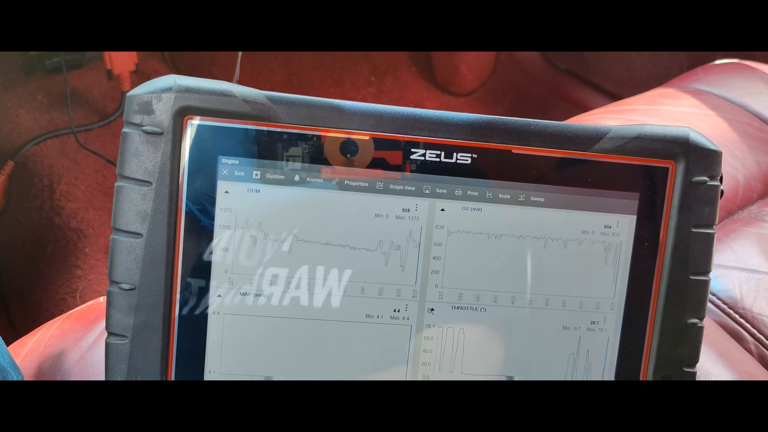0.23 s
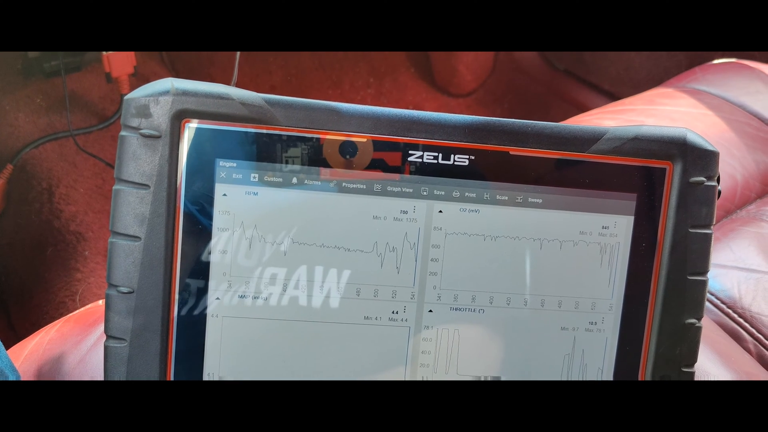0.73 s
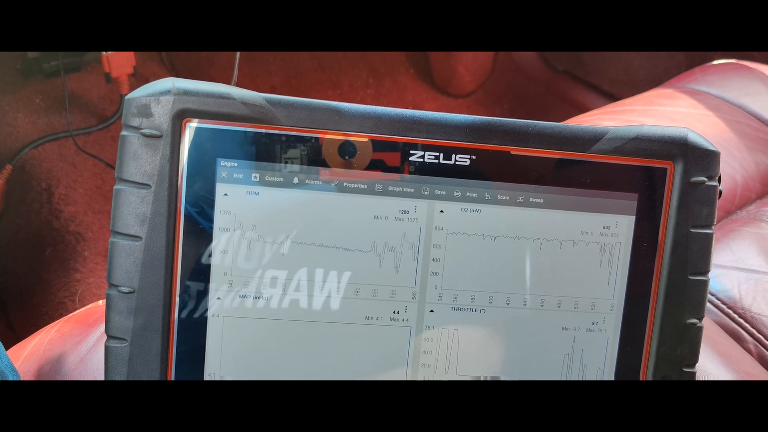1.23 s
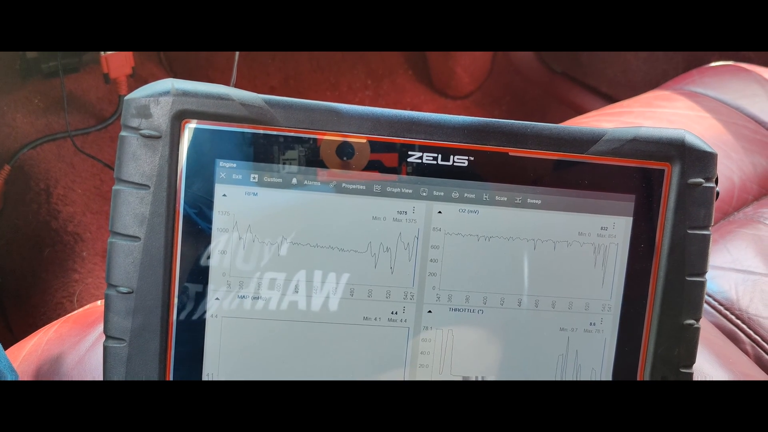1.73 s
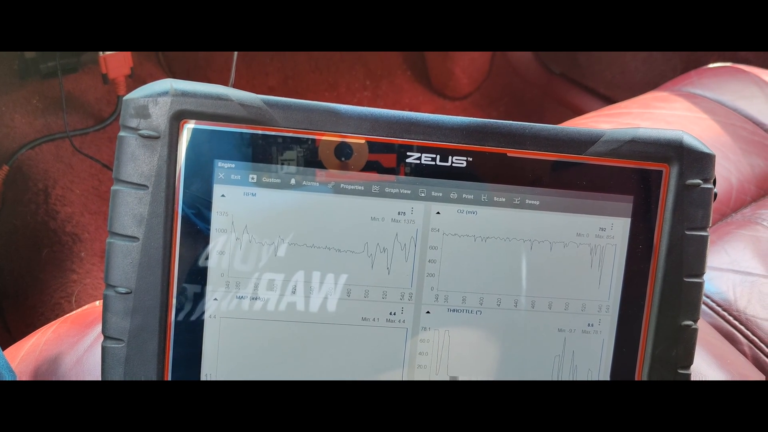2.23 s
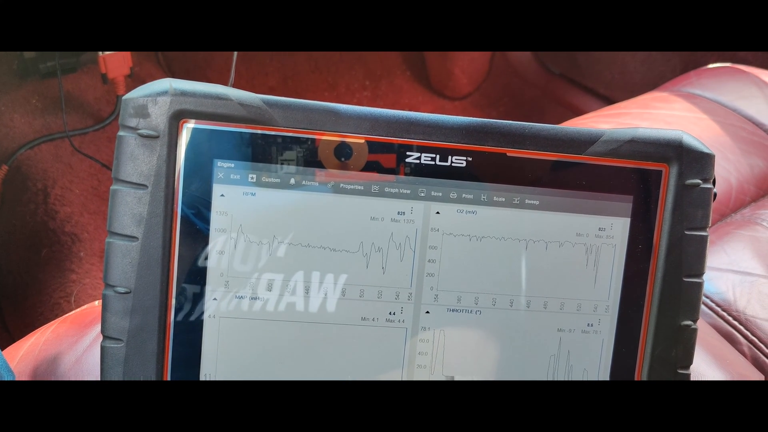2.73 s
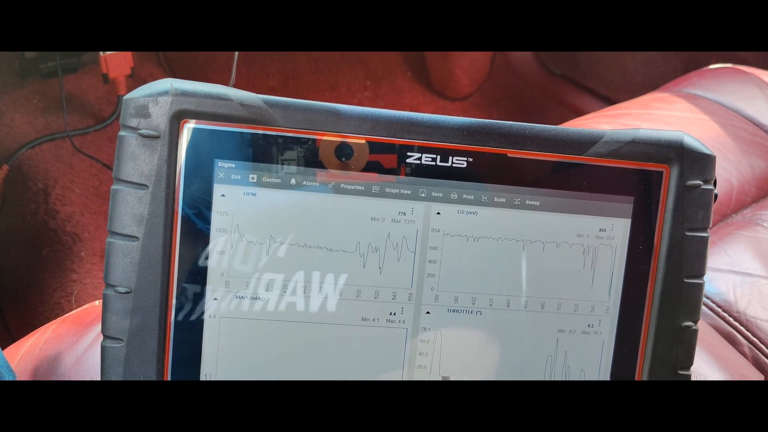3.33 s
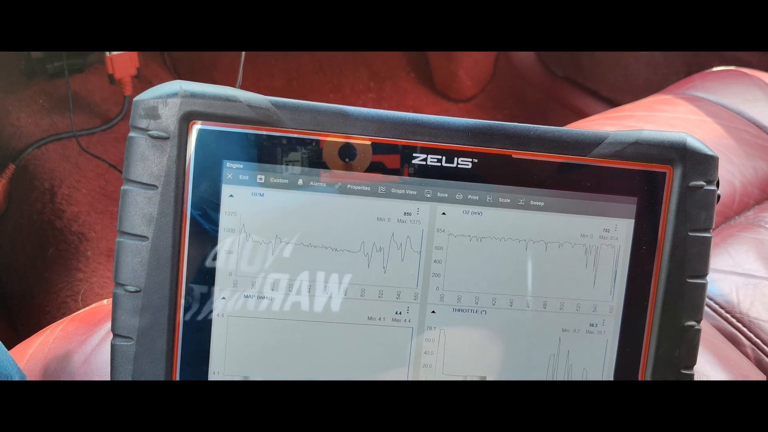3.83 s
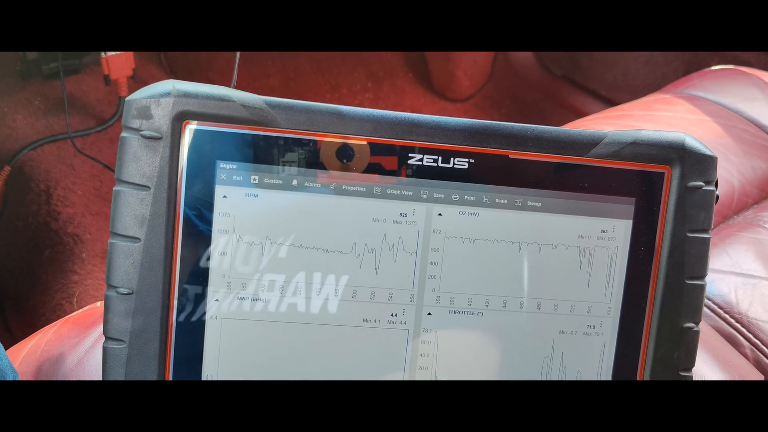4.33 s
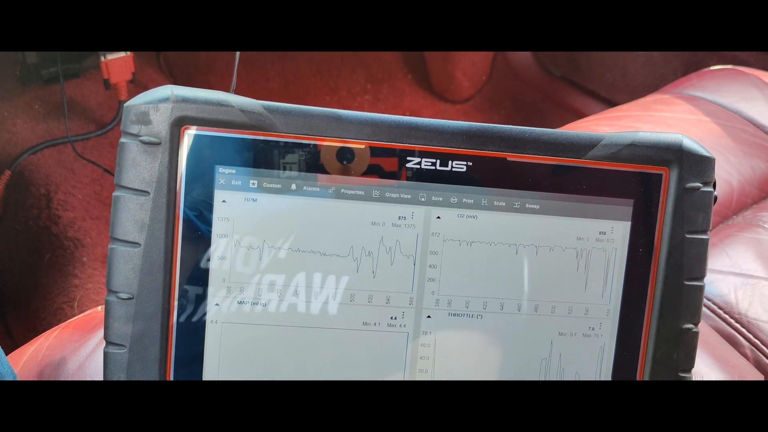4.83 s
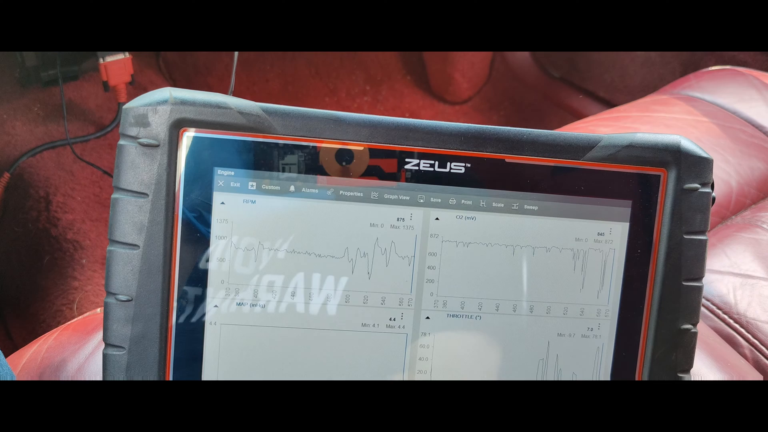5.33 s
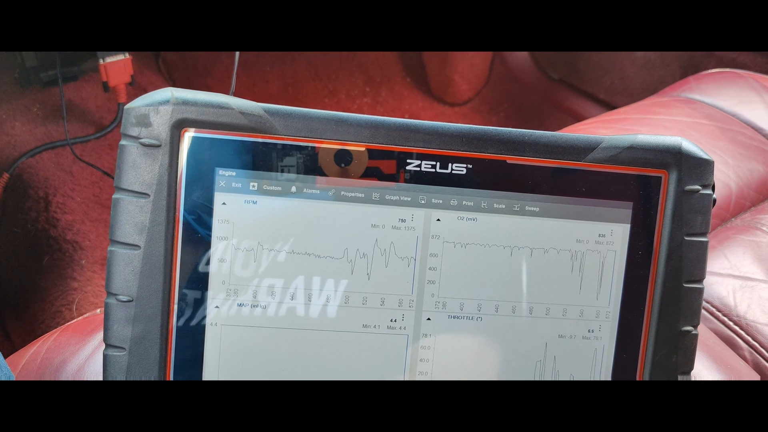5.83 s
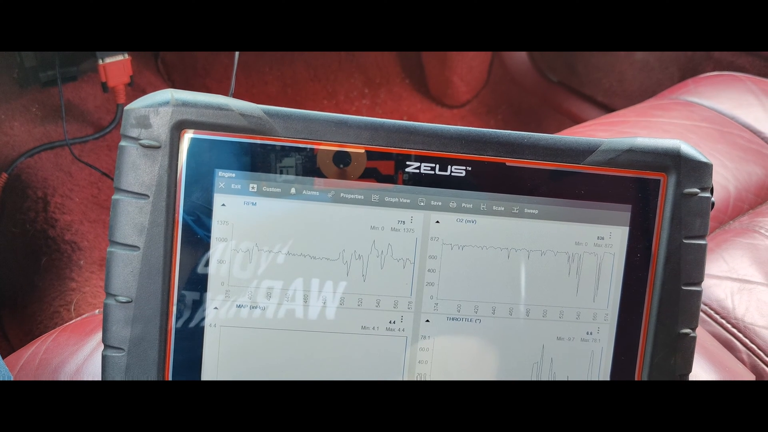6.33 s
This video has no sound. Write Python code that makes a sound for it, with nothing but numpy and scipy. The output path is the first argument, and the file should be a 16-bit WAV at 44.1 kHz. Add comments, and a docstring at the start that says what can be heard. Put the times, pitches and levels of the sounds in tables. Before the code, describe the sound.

A big eight-cylinder petrol engine booms, sags near a stall, recovers and idles unevenly, then pulls hard briefly before settling lower, heard inside a closed cabin.

```python
"""A hard exhaust boom comes first, as an eight-cylinder petrol engine drops from a pull and sags near a stall.
Heard by two microphones in the closed cabin, it recovers, idles unevenly and later pulls hard for a moment.
Sine waves make the boom and the accessory drone; filtered pulses make the uneven firing.
Shaped noise makes body rumble, roar and intake hiss; a panel hums, trim ticks, and single hard firings thump."""
import sys
import numpy as np
from scipy import signal
from scipy.fft import rfft, irfft
from scipy.io import wavfile
from scipy.ndimage import uniform_filter1d

SR = 44100
rng = np.random.default_rng(int(sys.argv[2]) if len(sys.argv) > 2 else 0)


def master_out(mix):
    """Clip the mix to full scale and print it as 16-bit PCM to the path in sys.argv[1]."""
    frames = np.transpose(np.atleast_2d(mix))
    ceiling = np.clip(frames, -1, 1)
    pcm = np.round(ceiling * 32767).astype(np.int16)
    wavfile.write(sys.argv[1], SR, pcm)


def to_linear_factor(level_db):
    """Convert decibel levels (scalar or array-like) to linear amplitude factors."""
    exponent = np.asarray(level_db, float) / 20
    return 10 ** exponent


N = 289737  # length of the scene [samples]


def evened(x):
    """Scales a sound to an rms of 1."""
    return x / np.sqrt(np.mean(x ** 2) + 1e-20)


def read(points, hz):
    """Reads a curve at the given frequencies, with straight lines on a log frequency scale."""
    f, value = np.transpose(points)
    return np.interp(np.log(hz + 1), np.log(f + 1), value)


def played(table):
    """Turns each column of a time table into one value a sample."""
    s, *columns = np.transpose(table)
    return [np.interp(np.arange(N) / SR, s, c) for c in columns]


def wander(per_s):
    """Slow random drift of rms 1: 24 sine waves up to per_s [Hz], the slower ones stronger."""
    t = np.arange(0, N + 256, 256) / SR
    slow = 0
    for f in per_s * np.geomspace(.1, 1, num=24):
        slow = slow + np.sin(2 * np.pi * (f * t + rng.random())) / np.sqrt(f)
    return np.interp(np.arange(N) / SR, t, evened(slow))


def colour(x, points, size):
    """Filters with the given spectrum, ringing only after each sound (minimum phase)."""
    gain_db = np.maximum(read(points, abs(np.fft.fftfreq(size, 1 / SR))), -100)
    log_gain = np.log(to_linear_factor(gain_db))
    taps = np.fft.ifft(np.exp(np.conj(signal.hilbert(log_gain)))).real[:size // 2]
    return signal.oaconvolve(x, taps)[:N]


def resonate(x, hz, width):
    """A narrow resonance: shifts hz down to zero, smooths, and shifts back."""
    turn = np.exp(2j * np.pi * np.cumsum(hz * np.ones(N)) / SR)
    r = np.exp(-np.pi * width / SR)
    smooth = signal.lfilter([1 - r], [1, -r], x / turn)
    return 2 * (turn * smooth).real


def ringing(lines, width):
    """Two draws of noise in narrow resonances, the strongest at rms 1."""
    white = rng.standard_normal((2, N))
    top_db = max(db for hz, db in lines)
    out = 0
    for hz, db in lines:
        line = np.array([resonate(w, hz, width) for w in white])
        out = out + to_linear_factor(db - top_db) * evened(line)
    return out


def airy(points, patchy_db, flicker_db):
    """Two draws of noise sharing one spectrum, drifting patches and a flicker across all pitches."""
    frames, hz = N // 128 + 5, np.fft.rfftfreq(N, 1 / SR)
    a, b, c, d, patches = rng.standard_normal((frames, 257, 5)).T
    patches = uniform_filter1d(patches, size=6, axis=0)  # wide in pitch
    patches = evened(uniform_filter1d(patches, size=20, axis=1))  # slow in time
    flicker = evened(uniform_filter1d(rng.standard_normal(frames), size=5))
    z = np.array([a + 1j * b, c + 1j * d]) * to_linear_factor(patchy_db * patches + flicker_db * flicker)
    flat = signal.istft(z, nperseg=512, noverlap=384)[1][:, :N]
    return evened(irfft(rfft(flat) * to_linear_factor(read(points, hz)), N))


def cabin(x, t60, wet_db):
    """Quick dense reflections off glass and trim, dying by 60 dB in t60 [s], ripple the colour."""
    t = np.arange(4000) / SR
    echoes = rng.standard_normal(4000) * to_linear_factor(-60 * t / t60) * (t > .001)
    taps = to_linear_factor(wet_db) * evened(echoes) / np.sqrt(4000)
    taps[0] = 1  # the direct sound
    return signal.oaconvolve(x, taps[None] / np.linalg.norm(taps), axes=1)[:, :N]


# times when the engine pulls against a load:
# (start [s], time until release [s], length of release [s], load [0-1])
PULL_TIMES = [(-0.05, 0.34, .7, 0.79), (3.61, 0.75, 0.2, 0.96)]


def pull():
    """Load on the engine: quick rise, hold, slower release."""
    t = np.arange(N) / SR
    total = 0
    for start, hold, release, load in PULL_TIMES:
        rise = (t - start) / 0.037  # full load after 0.037 s
        fall = 1 + (start + hold - t) / release
        total = total + load * np.clip(np.minimum(rise, fall), 0, 1)
    return total


# engine speed: (time [s], firing rate [firings per s])
FIRING_RATE = [(0.0, 62), (0.1, 56.4), (0.25, 46.6), (0.4, 38), (0.55, 31.2), (0.78, 43), (0.95, 48.4),
               (1.2, 70), (1.44, 79), (1.58, 76), (1.75, 61), (2.04, 62), (2.3, 54.8), (2.76, 56.2),
               (3.24, 53), (3.48, 57), (3.61, 52), (3.66, 56.2), (3.95, 62.4), (4.16, 55.4), (4.38, 53.8),
               (4.55, 47), (4.75, 50), (4.95, 49.8), (5.3, 47), (5.5, 53.7), (5.79, 49.6), (6.05, 51),
               (6.45, 46.5), (6.57, 42)]


def firing_rate():
    """The engine's changing speed, which times every firing."""
    return played(FIRING_RATE)[0]


# strength of each cylinder in firing order, two banks alternating unevenly: (level [dB])
CYLINDER_LEVELS = [1, -2, 0.5, 2.5, 0.2, 1.5, 2.5, -1.5]


def firings(fired, mean):
    """One pulse a firing: the cylinder's own strength and chance, around a common mean."""
    at = np.flatnonzero(np.diff(np.floor(fired), prepend=0) > 0)
    strength = to_linear_factor(np.array(CYLINDER_LEVELS))
    uneven = (strength - strength.mean())[np.arange(len(at)) % 8]
    chance = .16 * rng.uniform(-0.73, 1, 600)[:len(at)]
    pulses = np.zeros(N)
    pulses[at] = mean + uneven + chance
    return pulses


# how fully the cylinders fire, heard as the boom's first harmonic: (time [s], rms level [dB])
BOOM_LEVEL = [(0.0, -23), (0.06, -15.5), (0.18, -21.5), (0.26, -26), (0.36, -20.5), (0.46, -34),
              (0.56, -35), (0.71, -32), (0.78, -20.5), (0.85, -26), (0.95, -22), (1.02, -48), (1.2, -47),
              (1.44, -39.5), (1.58, -41), (1.76, -30.5), (1.92, -38), (2.04, -30.5), (2.76, -37),
              (3.24, -31.5), (3.48, -38), (3.61, -30.5), (3.67, -15), (3.76, -19), (3.82, -15),
              (3.87, -16.5), (3.92, -15.5), (4.35, -17), (4.42, -24), (4.5, -21), (4.55, -45),
              (4.63, -22.5), (4.7, -32.5), (4.76, -27), (4.88, -34.5), (4.93, -29.5), (5.08, -36),
              (5.3, -32), (5.5, -29.5), (5.79, -26.5), (5.98, -31), (6.12, -26.5), (6.32, -32),
              (6.45, -25.5), (6.57, -33)]


def boom_level():
    """The boom's level follows how fully the cylinders fire."""
    return played(BOOM_LEVEL)[0]


def boom(fired, *harmonics_db):
    """The even part of the firing: clean harmonics of the firing rate."""
    out = 0
    for k, db in enumerate(harmonics_db):
        out = out + np.sqrt(2) * to_linear_factor(db) * np.sin(2 * np.pi * (k + 1) * fired + 0.24 * k)
    return out


# exhaust and cabin colour of the firings: (frequency [Hz], relative level [dB])
LOPE_COLOUR = [(10, -45.5), (20, -17), (28, 4.5), (36, -2.5), (50, -2), (62, 0.5), (79, -4.5), (95, -15),
               (110, -13.5), (147, -7.5), (175, -17.5), (260, -43.5), (600, -103)]


def lope(fired, level_db):
    """What each firing has more or less than the average one, rung through exhaust and cabin."""
    rung = colour(firings(fired, 0), LOPE_COLOUR, size=32768)
    steady = rung / np.sqrt(uniform_filter1d(rung ** 2, size=SR // 3) + 1e-20)
    return steady * to_linear_factor(level_db)


def pump(fired):
    """A belt-driven accessory drones, wavering, at 1.37 times the firing rate until it cuts out."""
    running = np.clip((4.9 - np.arange(N) / SR) / .1, 0, 1)  # silent from 4.9 s, after a 0.1 s fade
    level_db = -41 + 2.0 * wander(5)
    return np.sqrt(2) * to_linear_factor(level_db) * running * np.sin(2 * np.pi * 1.37 * fired)


# floor pan at idle: (frequency [Hz], relative level [dB per Hz])
IDLE_RUMBLE = [(53, -31), (90, 2), (107, -6.5), (144, -1), (159, -1.5), (172, -12), (285, -21),
               (300, -17.5), (390, -41), (660, -120)]
# floor pan shaken by a strong boom: (frequency [Hz], relative level [dB per Hz])
BOOM_GROWL = [(76, -25), (130, -1), (247, -12), (296, -15), (404, -18), (449, -22.5), (510, -29),
              (567, -34), (700, -30), (910, -57), (1540, -120)]


def rumble(fired, level_db, boom_db):
    """The floor pan shakes; a strong boom drives its higher growl, part firing pulses and part rattle."""
    growl_share = 1 / (1 + to_linear_factor(-1.5 * (boom_db + 17.5)))  # half the power for a boom of -17.5 dB
    beat = evened(colour(firings(fired, 0.46), BOOM_GROWL, size=16384))
    rattle = airy(BOOM_GROWL, .7, .3) * (1 + .4 * np.cos(2 * np.pi * fired + .7))
    growl = .8 * beat + .6 * rattle
    idle = airy(IDLE_RUMBLE, 0.76, 0.12)
    return to_linear_factor(level_db) * (np.sqrt(1 - growl_share) * idle + np.sqrt(growl_share) * growl)


# air past the throttle, and clatter of the engine bay:
# (time [s], air level [dB], clatter level [dB])
AIR_AND_CLATTER = [(0.0, -43, -35), (0.03, -46.5, -39), (0.15, -48.5, -44), (0.36, -54.5, -47),
                   (0.6, -53, -46), (0.67, -54, -43), (0.88, -49, -41.5), (1.08, -48, -40),
                   (1.2, -49.5, -42), (1.7, -50.8, -43), (1.85, -51, -42), (2.3, -52.5, -44),
                   (3.0, -53, -44.5), (3.6, -53, -44), (3.85, -50.5, -40), (3.92, -48.5, -39.5),
                   (4.12, -49.5, -42), (4.3, -47.5, -43), (4.42, -51, -43.5), (4.54, -53.5, -46.5),
                   (4.75, -52.5, -43), (5.6, -54.5, -45), (6.5, -55.5, -45.5)]


def air_and_clatter():
    """The changing levels of the intake hiss and of the engine bay's roar."""
    return played(AIR_AND_CLATTER)


# roar before the resonances: (frequency [Hz], relative level [dB per Hz])
ROAR_COLOUR = [(140, -56), (240, 1), (353, -0.5), (463, -7), (507, -4.5), (754, -6), (1100, -6.5),
               (1500, -12.5), (2020, -10.5), (2390, -19.5), (3600, -34), (4680, -24.5), (7920, -120)]
# cabin and bulkhead resonances: (frequency [Hz], width [Hz], gain [dB])
PANEL_MODES = [(345, 11.4, 7.5), (499.7, 54, 7.5), (659, 100, 6), (898, 125, 6), (992, 50, 6.5),
               (1076.5, 27, 10), (1118, 18, 5), (1168, 8.6, 11), (1570, 76, 4.5), (1650, 23, 8.5),
               (1800, 58, 7), (2008, 58, 3.5), (2044, 40, 2.5), (2230, 250, 4.5), (2647, 105, 5.5)]


def roar(fired, level_db, full_db):
    """Combustion and valve gear noise through the bulkhead, pulsing with each firing."""
    hz = np.fft.rfftfreq(N, 1 / SR)
    modes_db = sum(db / (1 + (2 * (hz - f) / width) ** 2) for f, width, db in PANEL_MODES)
    noise = evened(irfft(rfft(airy(ROAR_COLOUR, 0.92, 0.23)) * to_linear_factor(modes_db), N))
    low = irfft(rfft(noise) / (1 + (hz / 700) ** 6), N)  # the part below about 700 Hz
    fuller = noise + (to_linear_factor(full_db) - 1) * low
    pulsing = 1 + 0.061 * np.cos(2 * np.pi * fired)
    return fuller * to_linear_factor(level_db - 0.07) * pulsing


# rushing air: (frequency [Hz], relative level [dB per Hz])
HISS_COLOUR = [(2600, -13.5), (3800, -13), (4450, -15.5), (4600, -8.5), (6200, -9), (6600, -3.5), (7700, 0),
               (8200, -3), (8950, -4.5), (9200, -10), (10400, -10), (11500, -14.5), (13400, -15.5),
               (13600, -20), (15300, -14), (15600, -50)]
# narrow duct resonances: (frequency [Hz], relative level [dB])
DUCT_LINES = [(4608, -74), (7257, -84), (7655, -74), (8118, -67), (8877, -85)]


def hiss(level_db):
    """Air rushing past the throttle, with narrow duct resonances."""
    rush = airy(HISS_COLOUR, 0.58, 0.41)
    ducts = to_linear_factor(-22.5) * ringing(DUCT_LINES, 30)
    return cabin(rush + ducts, 0.05, -6.0) * to_linear_factor(level_db)


# spells in which the panel sings:
# (start [s], length [s], level before mixing note and fuzz [dB], frequency [Hz])
HUM_SPELLS = [(0.0, 0.12, -53, 320), (0.944, 0.39, -51, 322), (1.327, .18, -46.5, 321),
              (1.708, 0.21, -52.5, 320.7), (2.21, 0.3, -48, 323), (2.579, .4, -45.5, 321),
              (3.334, 0.44, -47.5, 322.2), (4.02, 0.29, -52, 322), (5.163, .28, -48.5, 324.4)]


def hum():
    """A panel sings in spells: a steady note with narrow noise that makes it unsteady."""
    t = np.arange(N) / SR
    fuzz = evened(resonate(rng.standard_normal(N), 321.3, 9.5))
    out = to_linear_factor(-59.5) * fuzz  # always there, even between spells
    for start, length, db, hz in HUM_SPELLS:
        inside = np.minimum(t - start, start + length - t)
        fade = np.clip(inside / 0.063 + .5, 0, 1)  # each fade lasts 0.063 s
        out = out + to_linear_factor(db) * fade * (1.14 * np.cos(2 * np.pi * hz * t) + 0.42 * fuzz)
    return out


# small ticks: (time [s], level before colour and the final trim [dB])
TICK_TIMES = [(0.635, -32), (0.7059, -37.5), (1.8993, -38), (3.7702, -40), (5.1911, -42), (6.2486, -42)]
# colour of a tick: (frequency [Hz], relative level [dB])
TICK_COLOUR = [(470, -40), (800, 4.5), (2120, 0), (3230, -18), (7050, -8), (8270, -13), (9960, -4),
               (15400, -36)]


def ticks():
    """Short dry ticks of trim: a crack of noise with a quick tail."""
    out, t = np.zeros(N + 2000), np.arange(2000) / SR
    puffs = rng.standard_normal((len(TICK_TIMES), 2000))
    for (s, db), puff in zip(TICK_TIMES, puffs):
        out[round(s * SR):][:2000] += to_linear_factor(db - 60 * t / 0.042) * puff  # falls 60 dB in 0.042 s
    usual = colour(rng.standard_normal(N), TICK_COLOUR, size=2048).std()  # undoes the filter's gain
    return to_linear_factor(-5.5) * colour(out[:N], TICK_COLOUR, size=2048) / usual


# single hard firings among the weak ones: (time [s], level, 3 dB above the dip's depth [dB])
THUMP_TIMES = [(1.069, -18), (1.16, -22.5), (1.349, -22), (1.898, -23), (1.949, -21), (2.039, -23),
               (2.08, -18), (2.399, -21), (2.539, -14), (2.649, -21), (2.688, -18), (2.789, -15),
               (2.929, -27), (3.118, -30), (3.259, -18), (3.399, -18), (3.509, -19), (3.549, -17),
               (5.129, -20)]


def thumps():
    """A short dip of cabin pressure, deepest 4 ms after its listed time, with a swing on either side."""
    u = (np.arange(-1500, 1500) / SR - .004) / .0042
    dip = (u ** 2 - 1) * np.exp(-u ** 2 / 2)
    kicks = np.zeros(N)
    for s, db in THUMP_TIMES:
        kicks[round(s * SR)] = to_linear_factor(db - 3)
    return signal.oaconvolve(kicks, dip, "same")


# how alike the microphones hear the noise: (frequency [Hz], likeness [0-1])
LIKENESS = [(40, .998), (130, .9), (220, .8), (330, .9), (480, .7), (570, .4), (660, .78), (770, .55),
            (900, .86), (1100, .5), (1600, .35), (2100, .78), (2400, .25), (2850, .7), (3300, .1),
            (6200, .22), (6700, .8), (9300, .62), (11000, .9), (13000, .55), (15000, .6)]
# how far the left microphone leads: (frequency [Hz], phase [radians])
LEFT_LEAD = [(0, 0), (40, .09), (130, .2), (420, .25), (520, 1), (620, .3), (950, 1.1), (1050, 3.1),
             (1500, 3.2), (1950, 6.3), (2300, 6.1), (2550, 8), (2800, 6.3), (3100, 6.5), (4500, 12.4),
             (6500, 12.57), (16000, 12.57)]
# left minus right: (frequency [Hz], level [dB])
LEFT_LEAN = [(60, 0), (250, .3), (330, 1.5), (450, .5), (600, 3), (700, 1.8), (1050, 6.5), (1300, 5),
             (1500, 0), (1750, 5), (2000, 1), (3200, 0), (15000, 0)]


def pair(shared, x, other):
    """Two microphones a little apart: a shift and a tilt between them; the diffuse noise is only partly alike."""
    hz = np.fft.rfftfreq(N, 1 / SR)
    same = np.clip(read(LIKENESS, hz), 0, 1)
    shift = np.exp(-1j * np.interp(hz, *np.transpose(LEFT_LEAD)))
    lean = to_linear_factor(read(LEFT_LEAN, hz) / 2)
    # what the sum of both keeps
    centre = np.sqrt(abs(lean + same * shift / lean) ** 2 + (1 - same ** 2) / lean ** 2) / 2
    left = (rfft(shared) + rfft(x)) * lean
    right_noise = same * rfft(x) + np.sqrt(1 - same ** 2) * rfft(other)
    right = (rfft(shared) + right_noise) * shift / lean
    return irfft(np.array([left, right]) / centre, N)


def scene():
    """Speed, load and firing strength steer the engine layers, which then reach the two microphones."""
    rate, boom_db, load = firing_rate(), boom_level(), pull()
    air_db, roar_db = air_and_clatter()
    fired = np.cumsum(rate) / SR  # firings so far

    # each level: value without load [dB] + gain at full load [dB]
    second_db, third_db = -56.5 + 25 * load, -58.5 + 11 * load
    lope_db, rumble_db = -34 + 5.5 * load, -39.5 + 8.5 * load
    full_db = 0.53 + 1.8 * load

    # an exhaust resonance at 109.5 Hz, 14.5 Hz wide, lifts the second harmonic by up to 6.5 dB
    second_db += 6.5 / (1 + (2 * (2 * rate - 109.5) / 14.5) ** 2) + 1.3 * wander(11)
    rumble_db += -0.62 * np.arange(N) / SR  # the rumble calms slowly [dB per s]
    rumble_db += .5 * load * (rate - 55)  # under load it grows with speed
    rumble_db += 1.17 * wander(9)
    lope_db += 2.085 * wander(7.2)
    roar_db = roar_db + 0.32 * wander(9)

    shared = boom(fired, boom_db, second_db, third_db) + lope(fired, lope_db) + pump(fired)
    shared += hum() + ticks() + thumps()
    noise = rumble(fired, rumble_db, boom_db) + roar(fired, roar_db, full_db) + hiss(air_db)
    return pair(shared, *noise)


def band_limit(x):
    """A steep low-pass at the top of the band."""
    return signal.sosfilt(signal.butter(12, 15500, fs=SR, output="sos"), x)


def record(dry):
    """Passes the finished stereo mix through the last step of the chain."""
    return band_limit(dry)


dry = scene()
out = record(dry)
master_out(out)
```